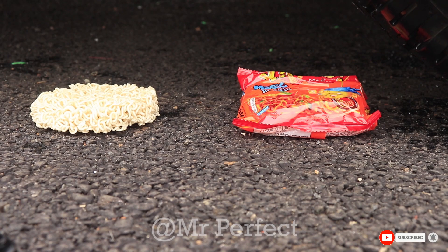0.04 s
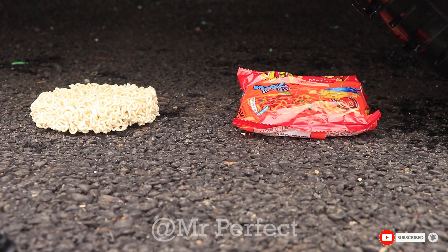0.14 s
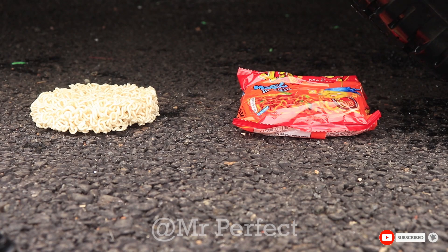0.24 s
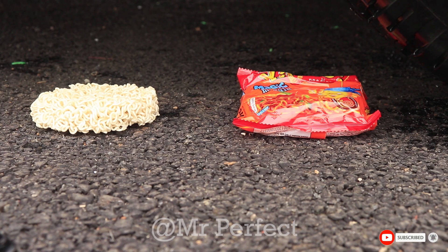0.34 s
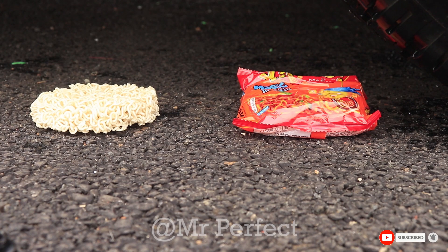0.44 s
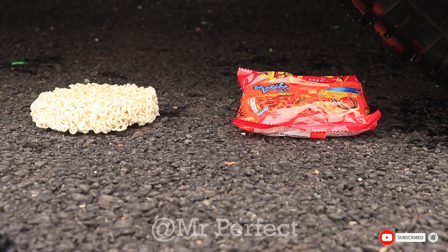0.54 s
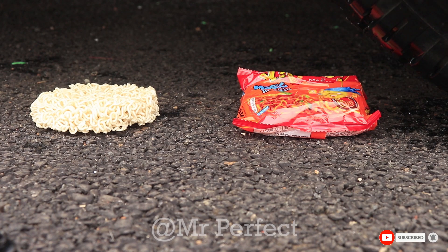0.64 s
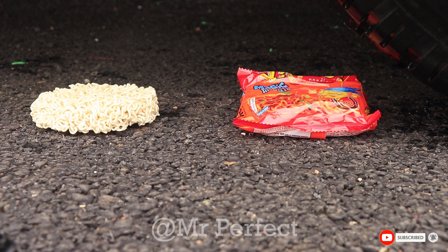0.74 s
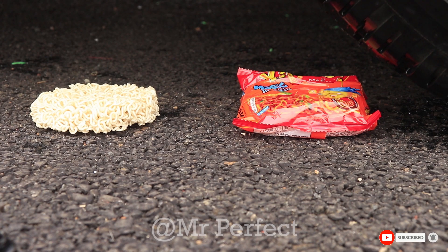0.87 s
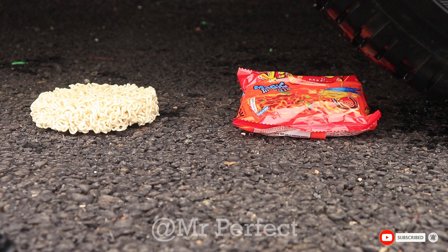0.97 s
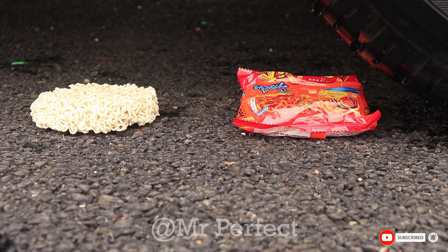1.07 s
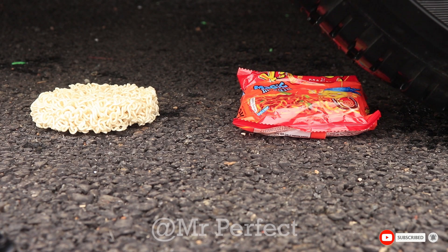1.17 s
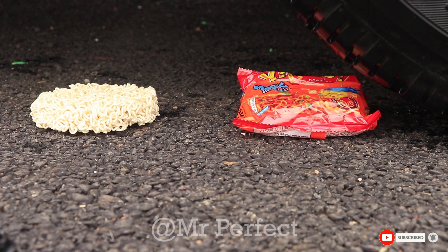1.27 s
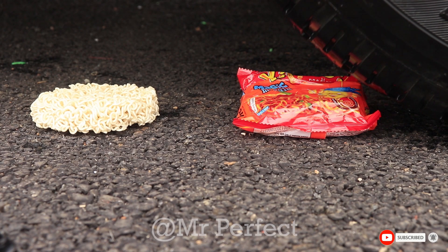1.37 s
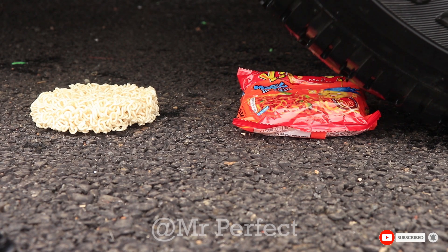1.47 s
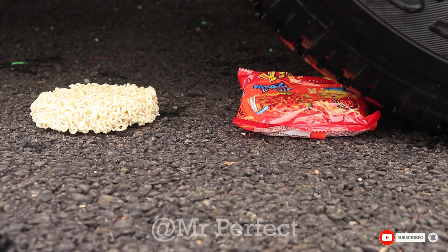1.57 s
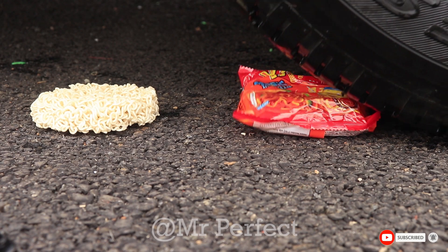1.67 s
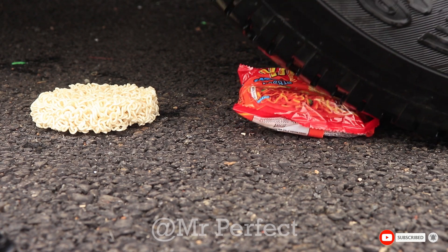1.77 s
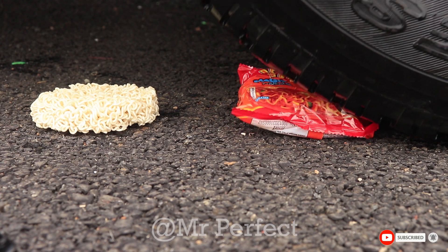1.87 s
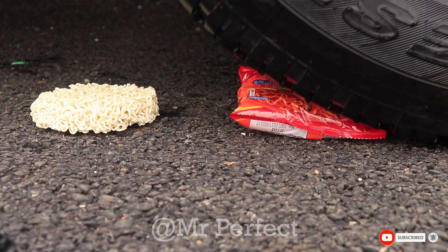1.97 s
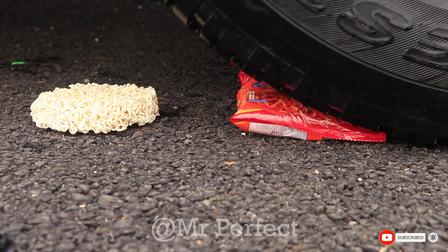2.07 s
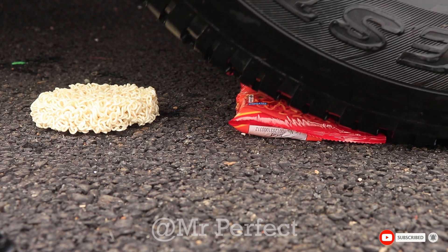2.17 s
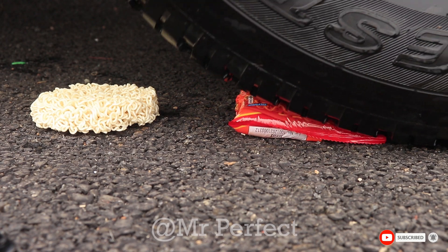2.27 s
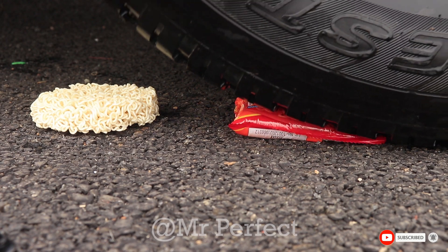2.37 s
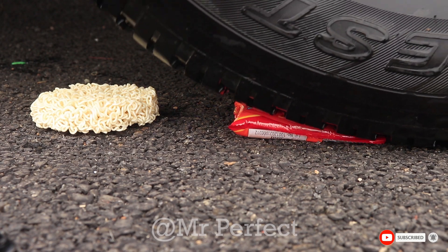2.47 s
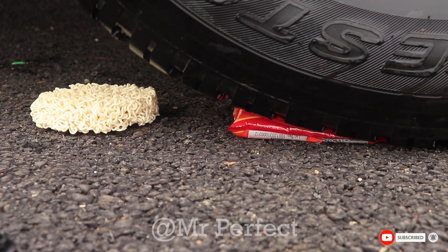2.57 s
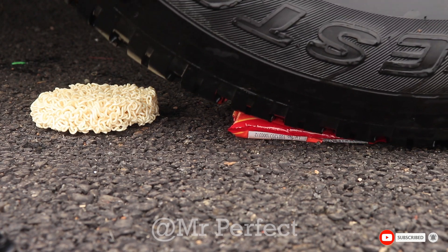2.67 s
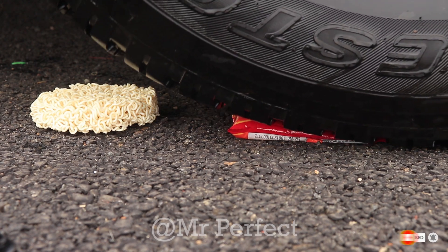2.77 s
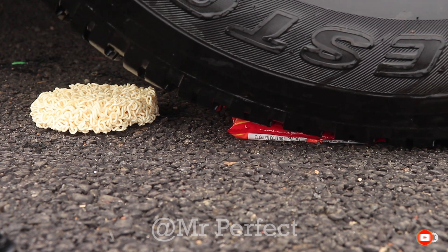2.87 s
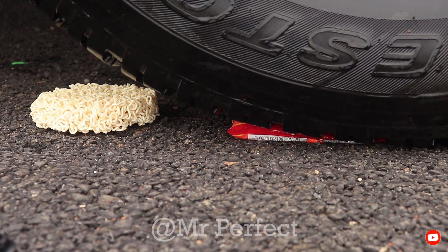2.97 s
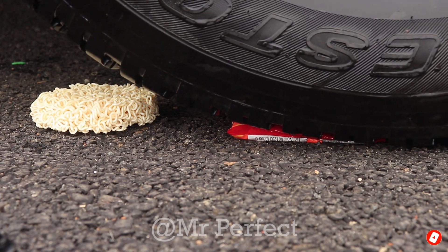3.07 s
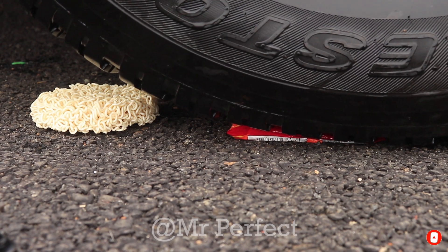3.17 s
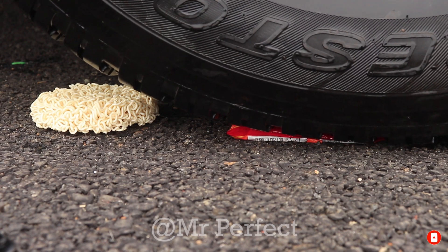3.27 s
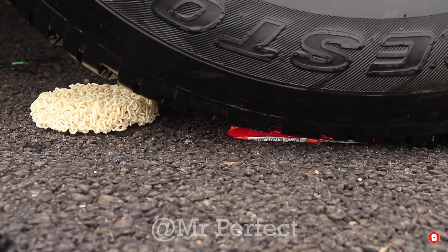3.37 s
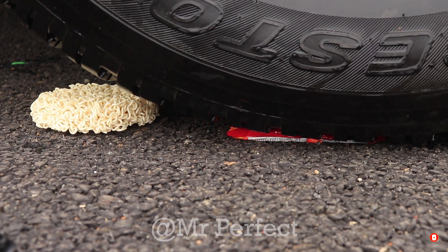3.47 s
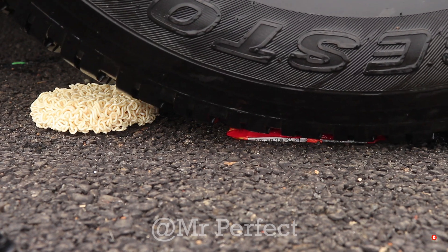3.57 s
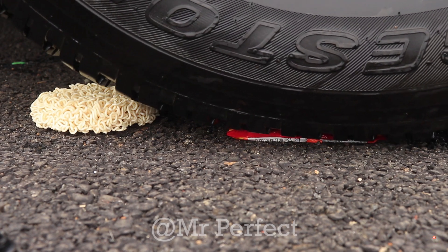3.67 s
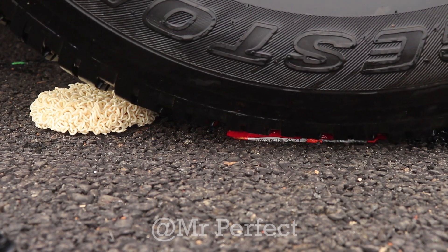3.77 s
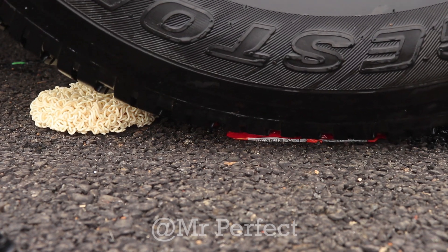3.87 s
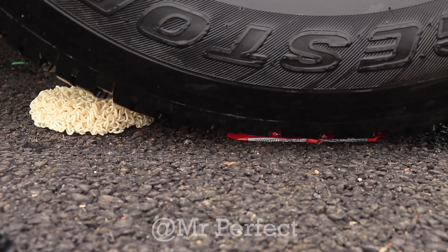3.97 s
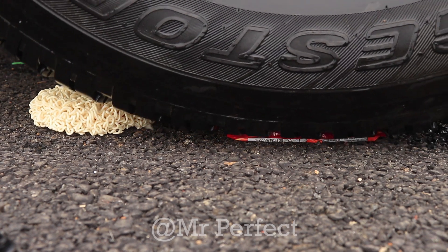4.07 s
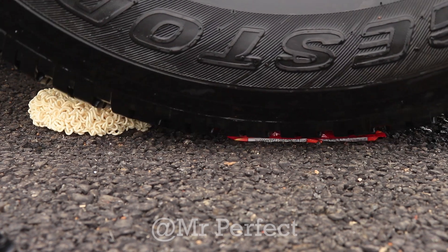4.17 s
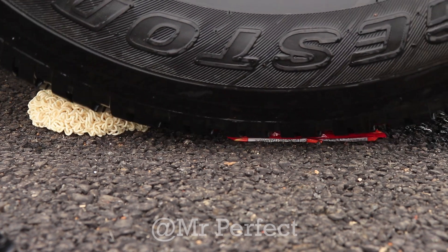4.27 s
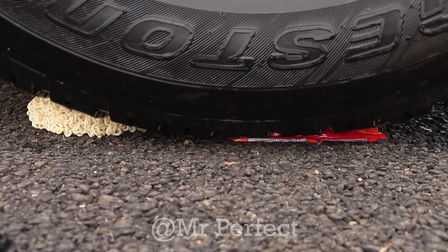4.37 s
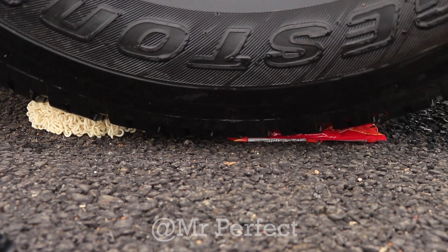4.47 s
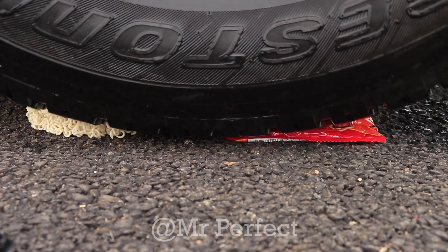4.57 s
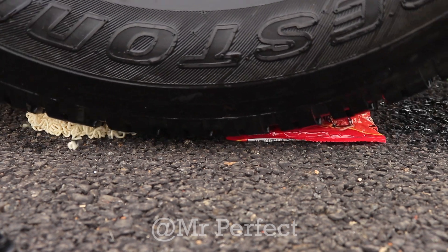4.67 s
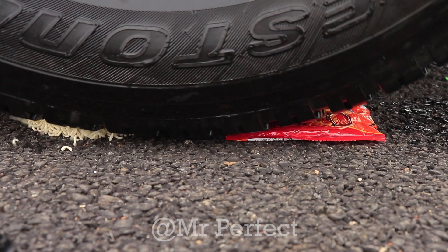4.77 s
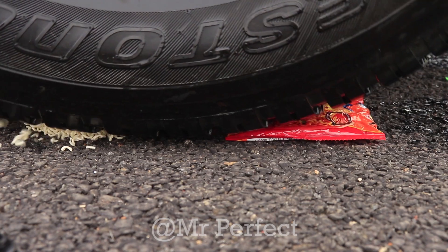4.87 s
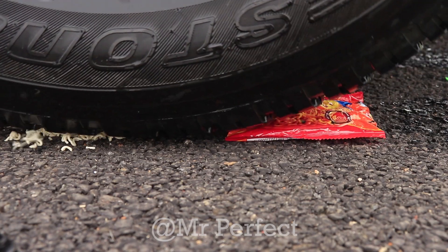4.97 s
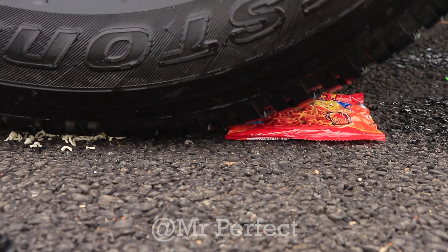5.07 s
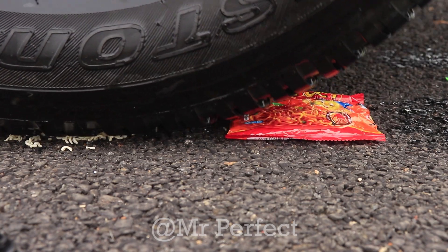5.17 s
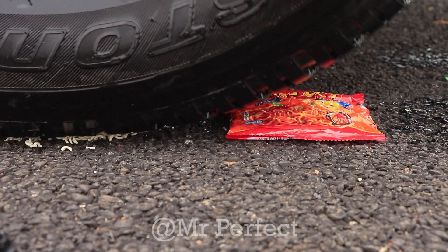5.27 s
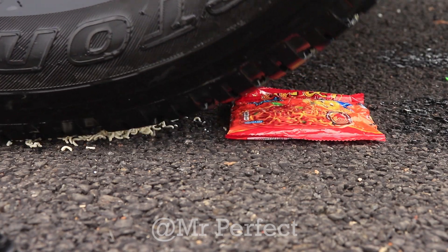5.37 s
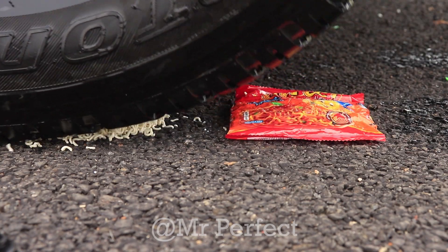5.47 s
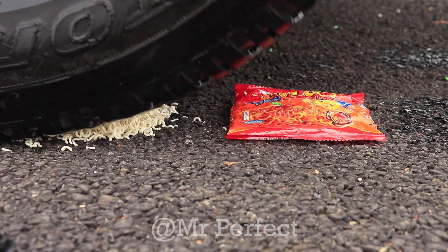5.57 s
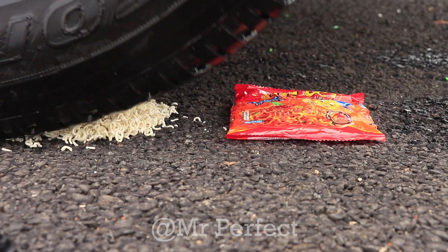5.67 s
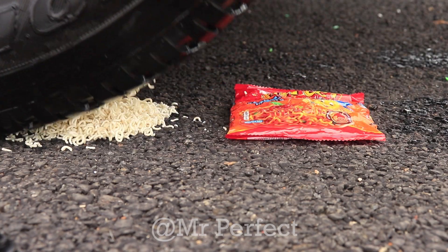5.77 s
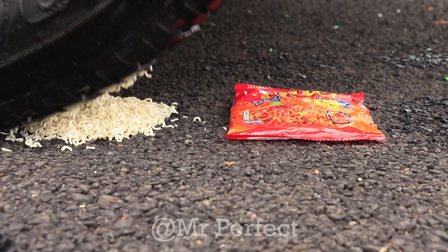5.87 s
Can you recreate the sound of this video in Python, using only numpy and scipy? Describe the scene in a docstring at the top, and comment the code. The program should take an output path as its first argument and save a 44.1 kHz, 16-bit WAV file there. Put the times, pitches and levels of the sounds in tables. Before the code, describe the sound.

Outdoors, a faint bird chirps in quiet air, then a slow tyre crushes a noodle packet and bare noodles with dense, sharp crunching and crinkling.

```python
"""On asphalt outdoors, close by, a car tyre creeps over a plastic packet of dry noodles, then a bare noodle block.
A small bird whistles in the quiet air, mostly before the tyre arrives; its chirps are gliding sine tones.
Grit ticks and stones knock softly, then strands break in avalanches of tiny cracks: short rings and noise sprays.
The film crinkles with sharp snaps, thicker pieces give way with dull knocks, and powdered crumbs hiss softly.
"""
import sys
import numpy as np
from scipy import signal
from scipy.io import wavfile
from scipy.ndimage import uniform_filter1d

SR = 44100
rng = np.random.default_rng(int(sys.argv[2]) if len(sys.argv) > 2 else 0)


def store_pcm(level_fs):
    """Save levels as 16-bit WAV."""
    pcm = np.round(np.clip(level_fs, -1, 1) * 32767).astype(np.int16)
    wavfile.write(sys.argv[1], SR, np.atleast_2d(pcm).T)


N = 261072
TIME = np.arange(N) / SR

# colour of the outdoor air: pitch_hz, relative level_db per Hz
AIR_COLOUR = [(15, -48), (25, -1.5), (80, -1.5), (190, -3), (263, -8), (405, -7.5), (818, -11.5),
              (1130, -8.5), (1400, -10.5), (1740, -11), (2550, -13), (4250, -13), (12200, -19),
              (16000, -33)]
AIR_DB = -67.5
# bird chirps: start_s, length_s, top_pitch_hz, level_db, place of the top (0-1),
# droop (share of the pitch lost at the end farther from the top)
CHIRPS = [(-.012, 0.092, 4340, -69, 0.5, 0.056), (.025, 0.041, 4830, -77, .1, .03),
          (0.09, .05, 3700, -80, .25, .05), (0.145, 0.073, 3170, -74.5, .55, .09),
          (0.361, 0.069, 4360, -65, .48, .1), (.69, 0.085, 4410, -65.5, 0.43, 0.12),
          (1.09, .088, 4395, -68.5, .55, 0.108), (1.16, .07, 4930, -80, 0.5, .015),
          (1.415, 0.11, 4376, -71, .52, .09), (5.812, 0.026, 4680, -63, .02, .13)]
CHIRP_ECHO_S, CHIRP_ECHO_DB = 0.045, -16

# grit and the first touch of the film tick under the tread: start_s, level_db, decay_s
GRIT = [(0.634, -58, 0.0034), (0.644, -46, 0.0013), (0.829, -57, 0.0025), (1.017, -56, 0.0026),
        (1.026, -49.5, 0.0016), (1.562, -34, 0.00057)]
# colour of the grit: pitch_hz, relative level_db per Hz
GRIT_COLOUR = [(100, -15), (500, -2.5), (2500, -5.0), (5000, 0), (8000, -5.0), (11000, -44), (16000, -45)]

# loose stones shifting, then the thickest pieces giving way under the rubber:
# start_s, level_db (over 1 ms), pitch_hz
KNOCKS = [(.7416, -61, 590), (1.0282, -60, 570), (1.2737, -59, 510), (1.2932, -59, 670), (1.5631, -47, 730),
          (1.7805, -33.5, 750), (1.825, -30.5, 810), (1.8974, -30.5, 790), (2.039, -22.5, 820),
          (2.0826, -19.5, 890), (2.1308, -41, 865), (2.1535, -37, 1300), (2.192, -35, 1010),
          (2.2207, -25, 1070), (3.1405, -32, 750), (3.4288, -30, 1260), (3.5938, -35, 910),
          (3.685, -39.5, 700), (3.8953, -19, 800), (3.8961, -23, 1650), (3.9805, -31.5, 415),
          (3.9896, -27, 1250), (4.0468, -33, 442), (4.08, -34.5, 635), (4.1575, -33.5, 460),
          (4.1898, -36, 410), (4.2386, -34.5, 370), (4.3055, -26.5, 450), (4.3877, -26.5, 500),
          (4.4033, -29, 606), (4.4224, -28.5, 430), (4.4527, -28.5, 397), (4.5022, -29.5, 623),
          (4.5675, -30, 430), (4.585, -31, 450), (4.6084, -29, 580), (4.6773, -30, 414),
          (4.6995, -27.5, 600), (4.7905, -30.5, 460), (4.8662, -29.5, 460), (4.909, -28, 700),
          (4.9528, -28, 730), (4.9963, -30, 775), (5.0455, -30, 464), (5.063, -34, 500), (5.0807, -33, 490),
          (5.104, -35, 530), (5.145, -30, 520), (5.2193, -35, 551), (5.314, -29, 630), (5.3966, -21.5, 495),
          (5.4203, -45, 810), (5.4307, -24.5, 476), (5.4568, -24, 715), (5.4637, -27.5, 540),
          (5.4825, -28, 590), (5.5318, -28.5, 625), (5.5607, -34, 665), (5.6598, -41.5, 740),
          (5.684, -40, 840), (5.7787, -45, 650), (5.8363, -42, 1120)]
# a spell of lesser knocks inside the packet: start_s, end_s, knocks_per_s, level_db above the crunch, pitch_hz
KNOCK_SPELL = (2.282, 3.8, 5.7, 13, 1100)
KNOCK_RANGE_DB, KNOCK_OCTAVES = 4, 0.45  # full spread of the lesser knocks
KNOCK_TOP = 2  # the rubber muffles a knock above this multiple of its pitch
# low knocks are mostly round thuds, high ones hard cracks
ROUND_BELOW_HZ, HARD_ABOVE_HZ, THUD_CYCLES = 457, 680, .55
# colour of the knocks: pitch_hz, relative level_db per Hz
KNOCK_COLOUR = [(40, -21), (150, -13.0), (260, -5.5), (380, 0.5), (560, 4.5), (1050, 2.0),
                (1650, 14.5), (3000, 10.5), (9000, -29), (15000, -42)]

# the tread settles onto the packet between these two times
CONTACT_START_S, CONTACT_END_S = 1.58, 1.63
# how hard the load breaks things, first the packet, from 3.55 s the bare block, before flurries and trims:
# time_s, muffled crunch level_db, breaking strands level_db, crisp film and crumbs level_db
CRUSH = [(1.62, -72, -62.5, -70), (1.68, -73.5, -55, -62), (1.79, -61, -45.5, -49),
         (1.91, -50.5, -40.5, -36), (2.14, -43.5, -34, -31.5), (2.27, -50, -33.5, -32.5),
         (2.56, -47.5, -40, -36), (2.7, -43.5, -43, -34.5), (3.03, -47.5, -46.5, -36.5),
         (3.2, -58, -45, -43.5), (3.55, -61.5, -54.5, -47.5), (4.0, -58, -55.5, -46),
         (4.12, -52.5, -53, -42), (4.4, -43, -43, -36.5), (4.78, -42, -38.5, -33.5),
         (5.08, -45, -42.5, -39), (5.33, -53.5, -47.5, -48.5), (5.47, -42.5, -53, -50.5),
         (5.63, -59, -58, -61.5), (5.92, -68, -74, -67)]
# flurries, when a row of strands goes at once, and lulls after a big break: centre_s, change_db
FLURRIES = [(1.825, -2), (2.238, -3.5), (2.535, -2.5), (2.66, 0.5), (2.91, -1.5), (3.214, 0), (3.33, 2),
            (3.52, -2.5), (3.645, 1.5), (3.782, 7), (3.831, -2.5), (3.945, 0.5), (4.012, -3), (4.086, 4),
            (4.166, -2.5), (4.645, -1), (4.834, -1.5), (4.95, 1)]
FLURRY_S = 0.035  # from the centre until the change has shrunk to about a third
# slack film at first touch and ground-down strands crack finely, as under a heavier load: time_s, added_load_db
GROUND_DOWN = [(1.65, 11), (1.8, 4), (1.95, 1.5), (2.2, 1.5), (2.7, 0), (3.2, -2.5), (3.7, 0), (4.05, 1),
               (4.35, 0), (5.0, 0.5), (5.42, 5.5), (5.62, 4.5)]
# a heavier load brings faster cracks; this extra rate applies at full load and grows tenfold per TENFOLD_DB
FULL_LOAD_DB, CRACKS_PER_S, TENFOLD_DB, FEWEST_CRACKS_PER_S = -40, 2700, 14, 150
# basic unevenness of the cracks, its growth per dB of load, and its ceiling
UNEVEN_DB, UNEVEN_PER_DB, MOST_UNEVEN_DB = 2.5, 0.01, 6
# the hollow in the packet rises in pitch as it is flattened, and later falls: time_s, pitch_hz, strength_db
HOLLOW = [(1.7, 614, -11.5), (2.08, 667, -0.5), (2.19, 890, 1), (2.27, 1330, -20), (2.4, 1570, -8.5),
          (3.3, 1630, -11.5), (4.1, 1510, -10), (5.4, 1140, -22)]
HOLLOW_WIDTH_HZ = 540
# the tread climbs onto something and shoves it against the road: start_s, length_s, level_db against the crunch
SHOVES = [(1.56, 0.68, 7), (3.982, 1.4, 4.5), (5.404, 0.59, -2)]
SHOVE_ATTACK_S, SHOVE_RELEASE_S, SHOVE_FADE_DB_PER_S = 0.071, 0.23, 14.5
# colour of the muffled crunch: pitch_hz, relative level_db per Hz
CRUNCH_COLOUR = [(25, -49), (50, -12), (90, -24.5), (180, -10.5), (260, -22), (370, -2.5), (500, -2),
                 (640, 3), (900, -3), (1500, -12), (4000, -34)]
# colour of the breaking strands: pitch_hz, relative level_db per Hz
STRAND_COLOUR = [(100, -23.5), (400, -4), (800, -5), (1150, 0.5), (1700, 1.5), (2400, -0.5), (3300, 1),
                 (5500, -19.5), (14000, -87)]
# colour of the crisp crackle: pitch_hz, relative level_db per Hz
CRISP_COLOUR = [(200, -13.5), (1500, -16.5), (2600, -9), (3700, -2.5), (5200, -1), (7000, 0), (8700, -2),
                (10200, -7.5), (11500, -13), (13000, -19), (16000, -22)]
# colour of the rubber being shoved: pitch_hz, relative level_db per Hz
DEEP_COLOUR = [(25, -51), (55, -32), (90, -1), (140, -5), (190, 3.5), (250, -2.5), (380, 7), (520, -16),
               (900, -3), (3000, -44)]

# crumbs ground to powder make a soft bed: pitch_hz, relative level_db per Hz
POWDER_COLOUR = [(200, -12.5), (1500, 4.5), (2600, -7), (4500, 3), (7000, -4), (9000, 0), (12000, -19),
                 (16000, -24)]
POWDER_DB = -19  # against the crackle

# the loudest sharp snaps: start_s, level_db (over 1 ms, without the body), pitch_hz,
# woody body level_db against the snap, before its trim
SNAPS = [(1.6553, -49, 4220, -12), (1.6637, -52, 5400.0, -22), (1.7033, -40, 5550, -18),
         (1.7389, -45, 4300.0, -9), (1.7662, -37, 5700.0, -15), (1.7802, -29.5, 3730, -1),
         (1.8157, -36, 3900.0, -5), (1.8227, -24, 5100, -13), (1.8558, -28.5, 5700.0, -18),
         (1.8616, -39, 6100.0, -21), (1.9007, -25.5, 5480, -11), (1.9348, -22, 5030, -5),
         (2.0627, -18.5, 3860, -20), (2.0833, -23, 4600.0, -16), (2.1155, -21.5, 4260, -1),
         (2.1535, -24, 3170, 1), (2.1959, -21, 4470, -8), (2.2238, -19.5, 5600, -10),
         (2.252, -28, 5900.0, -22), (2.3345, -25, 4800.0, -16), (2.3503, -23, 4400.0, -10),
         (2.3675, -22.5, 5100.0, -13), (2.4942, -20, 6200.0, -12), (2.5396, -17.5, 5050, -12),
         (2.5585, -22.5, 5570, -11), (2.5698, -29, 5300.0, -23), (2.6211, -20, 6000.0, -14),
         (2.6538, -18.5, 4900.0, -9.5), (2.6595, -20, 5900.0, -20), (2.6725, -18.5, 4630, -8),
         (2.683, -23, 6700.0, -14), (2.7074, -23, 4700.0, -3.5), (2.7201, -27, 5000.0, -15),
         (2.7509, -19, 6800, -15), (2.7766, -23, 5700.0, -5.5), (2.7866, -21.5, 7100, -20),
         (2.8367, -16, 6000.0, -11), (2.8672, -15.5, 4800, -8.5), (2.8822, -18.5, 4640, -10),
         (2.8966, -20, 4440, -15), (2.9191, -24, 5150, -12), (2.9372, -28, 6450, -21),
         (2.9443, -23, 5000.0, -17), (2.9734, -23, 5900.0, -7), (3.0135, -18, 5070, -15),
         (3.0261, -40, 6000.0, -9), (3.0345, -24.5, 6300.0, -23), (3.0566, -30, 6340, -14),
         (3.1523, -22.5, 4740, -7), (3.1669, -30, 5500.0, -20), (3.2862, -25.5, 4300.0, -3),
         (3.3135, -26.5, 6500.0, -28), (3.358, -24, 6900.0, -15), (3.3673, -24, 4770, -9),
         (3.4283, -23.5, 4900.0, -9), (3.4392, -29, 2780, -5), (3.4722, -35, 5600.0, -15),
         (3.4884, -35, 5500.0, -17), (3.5396, -43, 5600.0, -11), (3.5639, -33, 6300, -16),
         (3.5681, -40, 5400.0, -17), (3.5837, -37, 7400.0, -25), (3.5935, -32.5, 4200.0, 1),
         (3.6241, -32, 5300.0, -20), (3.6324, -34, 4000.0, -11), (3.638, -31, 5800.0, -21),
         (3.6559, -28.5, 6000.0, -20), (3.7252, -29, 6900, -10), (3.7683, -26, 6000.0, -6),
         (3.7913, -29.5, 6700.0, -8), (3.8435, -27, 6160, -12), (3.8532, -34, 5500.0, -6),
         (3.8734, -36, 4400.0, -13), (3.8955, -28, 3070, 2.5), (3.9032, -31, 4800.0, -11),
         (3.9396, -28, 8100, -23), (3.9452, -28.5, 5740, -17), (3.9539, -31.5, 4720, -2),
         (3.9897, -20, 5100.0, -11), (4.0404, -31, 7800, -8), (4.0459, -31, 7600.0, -7),
         (4.0651, -27, 5800.0, -24), (4.1481, -30, 6400.0, -21), (4.1588, -22, 6500.0, -20),
         (4.1768, -24.5, 5300, -13.5), (4.2298, -39, 5700.0, -15), (4.2356, -35, 6100.0, -5),
         (4.3254, -27, 5400.0, 0), (4.3863, -24, 4970, -5), (5.1275, -31, 7200.0, -15),
         (5.1843, -38, 5200.0, -12), (5.2353, -33, 5540, -6), (5.2484, -34.5, 4800.0, -10),
         (5.2794, -34, 4100.0, -1), (5.3293, -34.5, 5100.0, -7), (5.3975, -37.5, 2300.0, 3),
         (5.4202, -34.5, 4000.0, -11), (5.4564, -30.5, 3980, -20), (5.4729, -37, 4500.0, -7),
         (5.4815, -27, 7100, -10), (5.5014, -40, 4600.0, -13), (5.5252, -34, 4070, -13),
         (5.5323, -40, 4100.0, -7), (5.543, -51, 5200.0, -13), (5.5605, -48, 2310, -1),
         (5.5703, -40, 4000.0, 5), (5.5853, -47, 4000, -1), (5.6184, -49, 3400.0, 4),
         (5.6267, -48, 3300.0, 0), (5.6598, -45, 2600.0, -3), (5.6695, -49, 5800.0, -10),
         (5.6839, -48, 3700.0, -6), (5.7021, -43.5, 3400.0, -3), (5.7188, -38, 6300, -17),
         (5.7451, -44, 4000.0, -8), (5.8367, -41, 3740, -3), (5.8625, -49, 5300.0, -18),
         (5.8707, -48, 4000.0, -1)]
# spells of lesser snaps, while film or strands lie open beside the tread:
# start_s, end_s, snaps_per_s, level_db above the crackle
SNAP_SPELLS = [(1.901, 2.501, 17.8, -1), (2.5, 3.1, 26.8, 7), (3.1, 4.3, 33, 11), (5.101, 5.6, 36, 5)]
SNAP_RANGE_DB, SNAP_HZ, SNAP_OCTAVES = 7, 6000, 1  # lesser snaps: full spreads around a middle pitch
LESSER_BODY_DB = -9.5
# lesser cracks around each snap: earliest_s, latest_s, weakest_db, strongest_db
SNAP_CLUSTER = [(.0002, .0005, -7, -2), (.0005, .001, -14, -6), (.001, .004, -22, -12),
                (-.003, -.0007, -26, -10)]
SNAP_EDGE = 0.71  # the hard first edge of a snap against the ring that follows
SNAP_BODY_HZ, SNAP_BODY_DB = 1510, -3  # the piece behind a snap: middle pitch and level trim
# colour of the snaps: pitch_hz, relative level_db per Hz
SNAP_COLOUR = [(100, -43), (500, -14), (1500, -7), (2400, -6.5), (4500, -3), (8000, 3.5), (10300, -2.5),
               (12000, -17.5), (16000, -22)]
# colour of the woody body: pitch_hz, relative level_db per Hz
SNAP_BODY_COLOUR = [(100, -13), (500, -3.5), (1300, 2), (2400, 0), (5000, -26), (12000, -40)]

LEAD_S = .004  # time kept ahead of each break for the fine cracks that lead up to it
BASS_EDGE_HZ, EDGE_HZ = 93, 16000  # the tyre sounds carry little bass below this; top of the recorder's band


def gain_of(db):
    """Turns decibels into amplitude."""
    return 10 ** (np.asarray(db) / 20)


def evened(x):
    """Scales a sound to an rms of 1."""
    return x / np.sqrt(np.mean(x ** 2) + 1e-20)


def unit(x):
    """Scales a sound to an energy of 1."""
    return x / np.linalg.norm(x)


def curves(rows):
    """Draws each column of a time table as a curve with a value at every sample."""
    s, *columns = np.transpose(rows)
    return [np.interp(TIME, s, column) for column in columns]


def add(mix, s, sound):
    """Mixes a sound in at time s, cutting whatever falls outside."""
    at = round(s * SR)
    sound = sound[max(-at, 0):]
    part = mix[max(at, 0):][:len(sound)]
    part += sound[:len(part)]


def colour(points, size=4096):
    """Makes a filter with the given spectrum that responds as promptly as possible (minimum phase)."""
    f, db = np.transpose(points)
    bins_hz = abs(np.fft.fftfreq(size, 1 / SR)) + 1
    log_gain = np.log(gain_of(np.interp(np.log(bins_hz), np.log(f), db)))
    spectrum = np.exp(np.conj(signal.hilbert(log_gain)))
    return unit(np.fft.ifft(spectrum).real[:size // 2])


def filtered(x, response):
    """Passes a sound through a filter and keeps its length."""
    return signal.oaconvolve(x, response)[:len(x)]


def smooth(x, seconds):
    """Smooths with a triangular moving average, made of two plain ones."""
    width = max(int(seconds * SR), 2)
    return uniform_filter1d(uniform_filter1d(x, width), width)


def resonate(x, hz, width):
    """Rings at a moving pitch: shift that pitch to zero, smooth, then shift back."""
    turn = np.exp(2j * np.pi * np.cumsum(hz) / SR)
    r = np.exp(-np.pi * width / SR)
    return 2 * (turn * signal.lfilter([1 - r], [1, -r], x / turn)).real


def steadied(x, seconds):
    """Holds the power near 1 over the given time, leaving the fine grain as it is."""
    return x / np.sqrt(abs(smooth(x ** 2, seconds)) + 1e-4 * np.mean(x ** 2))


def reflections(x, near_db, near_t60, far_db, far_t60):
    """Adds quick scatter from near surfaces and a weaker, longer tail, both fading noise."""
    t = np.arange(SR // 2) / SR
    near, far = rng.standard_normal((2, len(t))) * (t > .0012)
    near = unit(near * gain_of(-60 * t / near_t60))
    far = unit(far * gain_of(-60 * t / far_t60))
    return x + filtered(x, gain_of(near_db) * near + gain_of(far_db) * far)


def spray(t, rise_s, fall_s):
    """Shapes splintering: fine cracks run ahead of the break at t = 0 and die away after it."""
    return np.exp(np.minimum(t / rise_s, -t / fall_s))


def ring(hz, cycles, size=1024):
    """Rings a broken piece for a few damped cycles, starting at LEAD_S."""
    t = np.maximum(np.arange(size) / SR - LEAD_S, 0)
    return unit(np.sin(2 * np.pi * hz * t) * np.exp(-t * hz / cycles))


def crack(hz, cycles, splinter, rise_s, fall_s, size=1024):
    """Breaks one piece: its ring inside a short spray of splintering noise."""
    splinters = rng.standard_normal(size) * spray(np.arange(size) / SR - LEAD_S, rise_s, fall_s)
    return unit(ring(hz, cycles) + splinter * unit(splinters))


def air():
    """Quiet outdoor rumble and hiss: steady coloured noise."""
    return gain_of(AIR_DB) * evened(filtered(rng.standard_normal(N), colour(AIR_COLOUR)))


def bird():
    """Thin arched whistles, some way off, with a faint echo and tail from the surroundings."""
    out = np.zeros(N)
    for s, length, top_hz, db, top, droop in CHIRPS:
        u = np.linspace(0, 1, int(length * SR))
        fall = droop * ((u - top) / max(top, 1 - top)) ** 2
        flutter = 0.0056 * evened(smooth(rng.standard_normal(len(u)), 0.00076))
        hz = top_hz * (1 - fall + flutter)
        whistle = np.sin(np.pi * u) * np.sin(2 * np.pi * np.cumsum(hz) / SR)
        chirp = gain_of(db) * evened(whistle)
        add(out, s, chirp)
        add(out, s + CHIRP_ECHO_S, gain_of(CHIRP_ECHO_DB) * chirp)
    return reflections(out, near_db=-6.5, near_t60=.08, far_db=-11.5, far_t60=.4)


def grit():
    """Grit ticks under the approaching tread: fast-fading bursts of coloured noise."""
    out, tone = np.zeros(N), colour(GRIT_COLOUR)
    t = np.arange(SR // 20) / SR
    for s, db, decay_s in GRIT:
        burst = rng.standard_normal(len(t)) * np.exp(-t / decay_s)
        add(out, s, gain_of(db) * filtered(burst, tone))
    return out


def round_thud(hz, size=1024):
    """A push through the rubber that swells and dies within two cycles."""
    turns = (np.arange(size) / SR - LEAD_S) * hz - .5
    return unit(np.cos(2 * np.pi * turns) * np.exp(-(turns / THUD_CYCLES) ** 2))


def knocks(rows):
    """Stones or thick pieces knock; the thud is damped within a few cycles, so low ones last longer."""
    out, tone = np.zeros(N), colour(KNOCK_COLOUR)
    for s, db, hz in rows:
        thud = crack(0.82 * hz, cycles=1.0, splinter=.6, rise_s=0.00036, fall_s=2.7 / hz)
        knock = filtered(thud + 0.42 * ring(1.21 * hz, cycles=0.78), tone)
        muffle = signal.butter(1, min(KNOCK_TOP * hz, SR / 3), fs=SR, output="sos")
        knock = signal.sosfilt(muffle, knock)
        hard = np.interp(hz, (ROUND_BELOW_HZ, HARD_ABOVE_HZ), (.35, 1))
        knock = hard * unit(knock) + (1 - hard) * round_thud(hz)
        # the root turns a level over 1 ms into energy
        add(out, s - LEAD_S, gain_of(db) * np.sqrt(SR / 1000) * unit(knock))
    return out


def breaking_db():
    """Levels of crunch, strands and crackle: the slow crush with its brief flurries and lulls."""
    flurries = sum(db * np.exp(-((TIME - s) / FLURRY_S) ** 2) for s, db in FLURRIES)
    return np.array(curves(CRUSH)) + flurries


def shoving():
    """Each shove sets in quickly, eases as the pieces flatten, and lets go."""
    out = np.zeros(N)
    for s, length, db in SHOVES:
        t = np.arange(0, length, 1 / SR)
        push = np.clip(np.minimum(t / SHOVE_ATTACK_S, (length - t) / SHOVE_RELEASE_S), 0, 1)
        add(out, s, push * gain_of(db - SHOVE_FADE_DB_PER_S * t))
    return out


def cracks(rate, avalanche, spread_db, low_hz, high_hz, cycles, splinter, rise_s, fall_s, count=14, size=1024):
    """Random fractures, many small and few large, each ringing one of several sizes of piece."""
    happens = (rng.random(N) < rate / SR) * rng.choice([-1, 1], N)
    strength = happens * avalanche * gain_of(spread_db * np.minimum(rng.exponential(1, N), 3.1))
    # neighbouring cracks break pieces of like size, so each burst has its own colour
    wander = evened(smooth(rng.standard_normal(N), .003)) + .2 * rng.standard_normal(N)
    piece = (count * abs(wander % 2 - 1)).astype(int)
    pitches = np.geomspace(low_hz, high_hz, count)
    rings = sum(filtered(strength * (piece == k), ring(hz, cycles)) for k, hz in enumerate(pitches))
    envelope = unit(spray(np.arange(size) / SR - LEAD_S, rise_s, fall_s))
    power = filtered(strength ** 2, envelope ** 2)
    return rings + splinter * np.sqrt(abs(power)) * rng.standard_normal(N)


def avalanches(uneven_db):
    """One break sets off its neighbours: bursts of a millisecond or two inside longer slips."""
    quick, slow = rng.standard_normal((2, N))
    surge = evened(smooth(quick, 0.0012)) + 0.37 * evened(smooth(slow, 0.012))
    return gain_of(1.19 * uneven_db * np.clip(evened(surge), -2.5, 1.7))


def crushing():
    """Shared avalanches of cracks drive the muffled crunch, the breaking strands and the crisp crackle."""
    crunch_db, strand_db, crisp_db = breaking_db()
    load_db = (crunch_db + strand_db + crisp_db) / 3 - FULL_LOAD_DB + curves(GROUND_DOWN)[0]
    rate = FEWEST_CRACKS_PER_S + CRACKS_PER_S * 10 ** (load_db / TENFOLD_DB)
    avalanche = avalanches(np.minimum(UNEVEN_DB + UNEVEN_PER_DB * load_db, MOST_UNEVEN_DB))
    crisp = cracks(1.1 * rate, avalanche, spread_db=4.0, low_hz=2900, high_hz=11000, cycles=1.1,
                   splinter=.6, rise_s=.00015, fall_s=.00022, count=22)
    strand = cracks(.9 * rate, avalanche, spread_db=5.0, low_hz=990, high_hz=3540, cycles=0.87,
                    splinter=0.99, rise_s=0.00033, fall_s=0.0016)
    crunch = cracks(.9 * rate, avalanche ** 1.5, spread_db=4.5, low_hz=290, high_hz=950, cycles=0.43,
                    splinter=2.4, rise_s=0.0004, fall_s=0.0023)
    # pieces pinned against the road shove the rubber itself
    rumble = avalanche ** 1.27 * rng.standard_normal(N)
    deep = steadied(filtered(rumble, colour(DEEP_COLOUR)), 0.6)
    # the hollow rings twice over, for a steeper resonance
    hollow_hz, hollow_db = curves(HOLLOW)
    hollow = resonate(strand, hollow_hz, HOLLOW_WIDTH_HZ)
    hollow = steadied(resonate(hollow, hollow_hz, HOLLOW_WIDTH_HZ), 0.11)
    crisp = steadied(filtered(crisp, colour(CRISP_COLOUR)), 0.086)
    strand = steadied(filtered(strand, colour(STRAND_COLOUR)), 0.41)
    crunch = steadied(filtered(crunch, colour(CRUNCH_COLOUR)), 0.18)
    contact = np.interp(TIME, (CONTACT_START_S, CONTACT_END_S), (0, 1))
    return contact * (gain_of(crisp_db) * crisp
                      + gain_of(strand_db - 2.5) * (strand + gain_of(hollow_db) * hollow)
                      + gain_of(crunch_db - 1.0) * (crunch + shoving() * deep))


def powder():
    """A bed of fine, uneven coloured noise for countless tiny grains, following the crackle slowly."""
    contact = np.interp(TIME, (CONTACT_START_S, CONTACT_END_S), (0, 1))
    level = smooth(gain_of(curves(CRUSH)[2]), .03) * contact
    flicker_db = 4.5 * evened(smooth(rng.standard_normal(N), 0.0015))
    grains = rng.standard_normal(N) * gain_of(flicker_db)
    return gain_of(POWDER_DB) * level * evened(filtered(grains, colour(POWDER_COLOUR)))


def snaps(rows):
    """Film buckles and strands snap: a hard edge and short ring amid lesser cracks, over the piece's ring."""
    out, tone, body_tone = np.zeros(N), colour(SNAP_COLOUR), colour(SNAP_BODY_COLOUR)
    for s, db, hz, body_db in rows:
        burst = crack(hz, cycles=1.4, splinter=.45, rise_s=.0001, fall_s=.0005)
        burst[round(LEAD_S * SR) + 1] += SNAP_EDGE
        for early, late, weak, strong in SNAP_CLUSTER:
            when, size, pitch = rng.random(3)
            lesser = gain_of(weak + size * (strong - weak)) * ring(hz * 2 ** (pitch - .4), cycles=1.3)
            burst = burst + np.roll(lesser, round((early + when * (late - early)) * SR))
        body_hz = SNAP_BODY_HZ * 2 ** (rng.random() - .5)
        body = crack(body_hz, cycles=2.0, splinter=1.0, rise_s=.0001, fall_s=0.0013)
        body = gain_of(body_db + SNAP_BODY_DB) * unit(filtered(body, body_tone))
        snap = unit(filtered(burst, tone)) + body
        # the root turns a level over 1 ms into energy
        add(out, s - LEAD_S, gain_of(db) * np.sqrt(SR / 1000) * snap)
    return out


def scattered(start, end, per_s, level_db, range_db, hz, octaves, count=96):
    """Rows start_s, level_db, pitch_hz of breaks at uneven intervals, around a level curve and a pitch."""
    when, weight, pitch = rng.random((count, 3)).T
    s = start + (np.arange(count) + when) / per_s
    db = np.interp(s, TIME, level_db) + range_db * (weight - .5)
    rows = np.transpose([s, db, hz * 2 ** (octaves * (pitch - .5))])
    return rows[s < end]


def lesser_breaks():
    """The lesser snaps follow the level of the crackle, the lesser knocks that of the crunch."""
    crunch_db, _, crisp_db = breaking_db()
    small_snaps = []
    for start, end, per_s, db in SNAP_SPELLS:
        rows = scattered(start, end, per_s, crisp_db + db, SNAP_RANGE_DB, SNAP_HZ, SNAP_OCTAVES)
        small_snaps += [(*row, LESSER_BODY_DB) for row in rows]
    start, end, per_s, db, hz = KNOCK_SPELL
    small_knocks = scattered(start, end, per_s, crunch_db + db, KNOCK_RANGE_DB, hz, KNOCK_OCTAVES)
    return small_snaps, small_knocks


def scene():
    """Everything under the tyre, with the bird and the air behind it; the tyre sounds carry little deep bass."""
    background = air() + bird()
    small_snaps, small_knocks = lesser_breaks()
    breaks = snaps(SNAPS) + knocks(KNOCKS) + snaps(small_snaps) + knocks(small_knocks)
    tyre = grit() + crushing() + powder() + breaks
    tyre = signal.sosfilt(signal.butter(2, BASS_EDGE_HZ, "highpass", fs=SR, output="sos"), tyre)
    # scatter from the tyre wall and road, and a weak tail from the car's underside
    tyre = reflections(tyre, near_db=-16, near_t60=.035, far_db=-24, far_t60=.15)
    return (tyre + background)[None]


def record(dry):
    """The small microphone loses the deepest bass; then the recorder's band limit cuts the top."""
    thin = signal.sosfilt(signal.butter(2, 32, "highpass", fs=SR, output="sos"), dry)
    band = signal.firwin(511, EDGE_HZ, window=("kaiser", 9), fs=SR)
    return signal.oaconvolve(thin, band[None], "same")


dry = scene()
out = record(dry)
store_pcm(out)
```